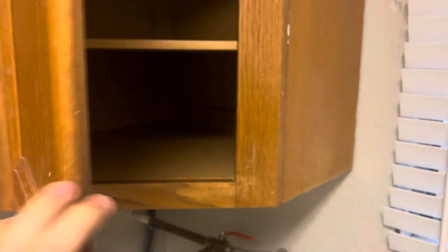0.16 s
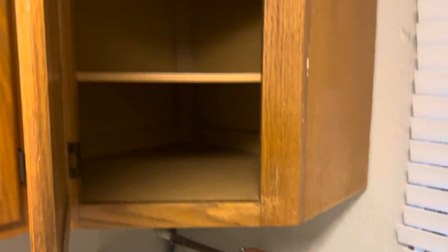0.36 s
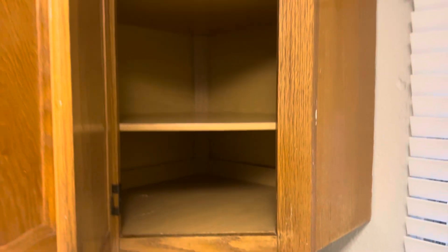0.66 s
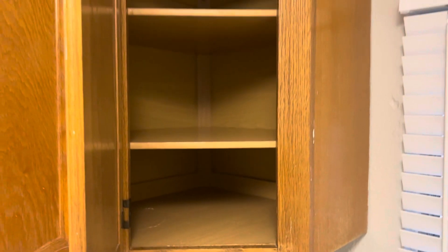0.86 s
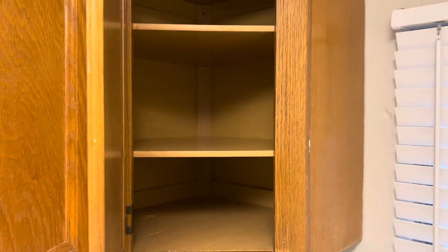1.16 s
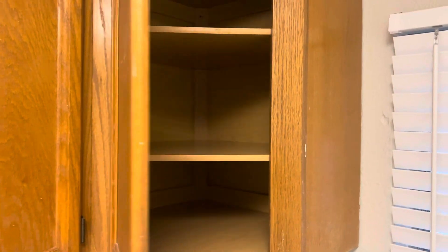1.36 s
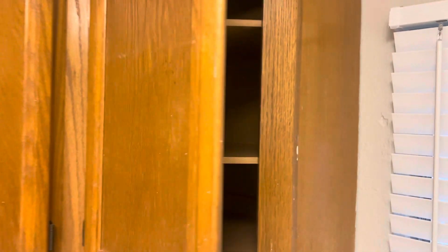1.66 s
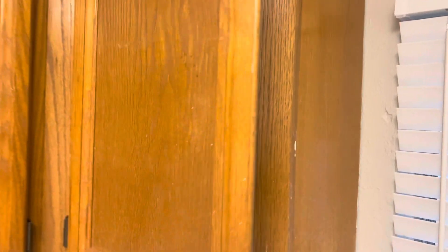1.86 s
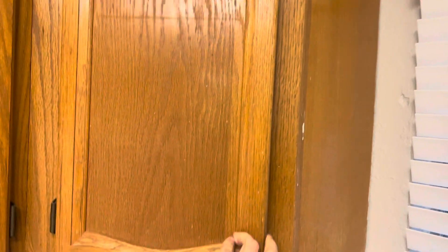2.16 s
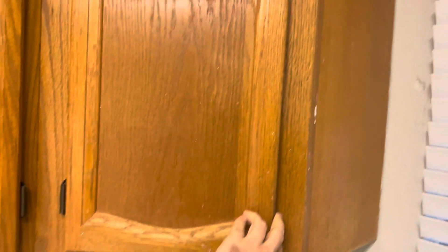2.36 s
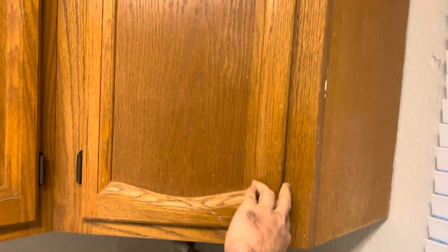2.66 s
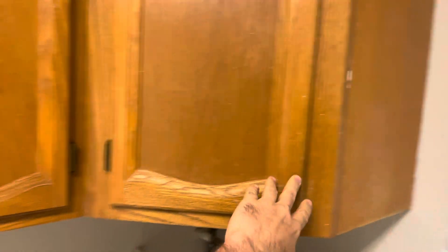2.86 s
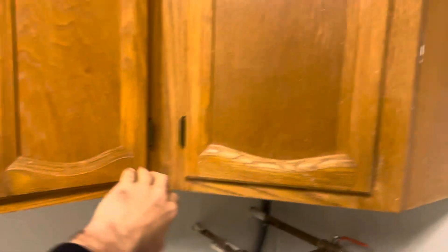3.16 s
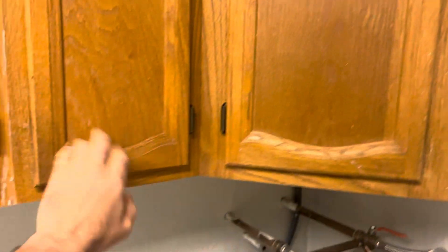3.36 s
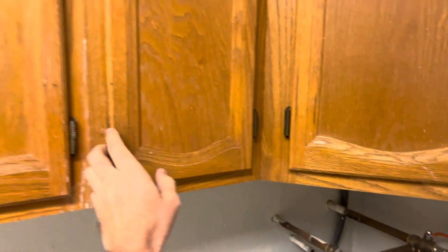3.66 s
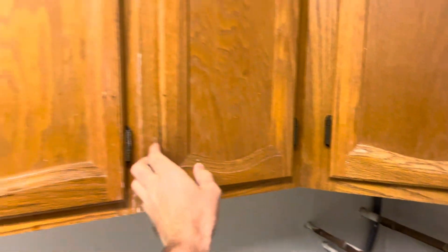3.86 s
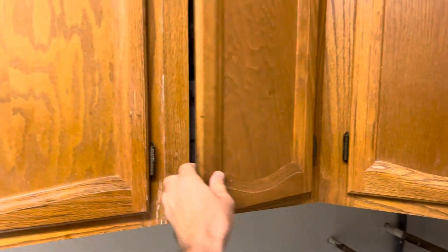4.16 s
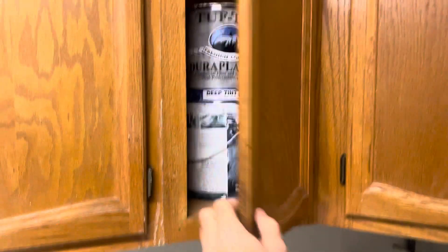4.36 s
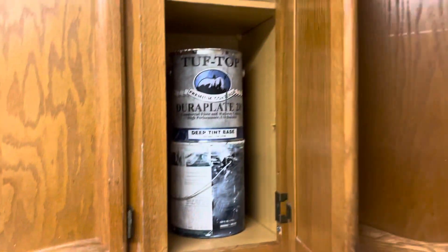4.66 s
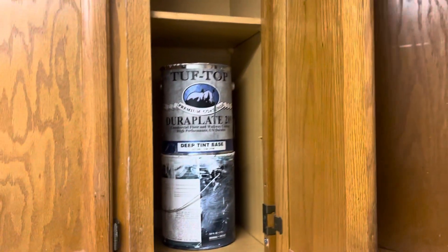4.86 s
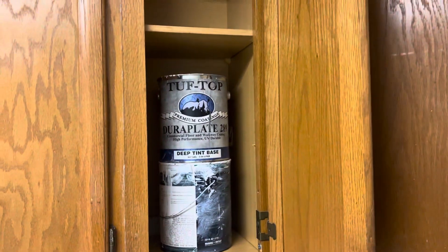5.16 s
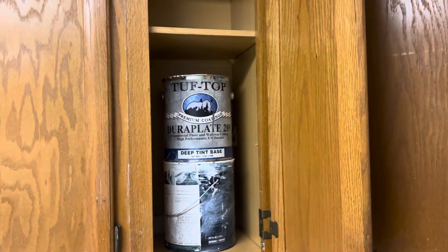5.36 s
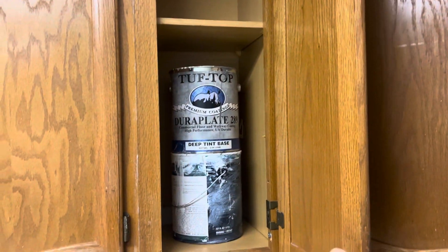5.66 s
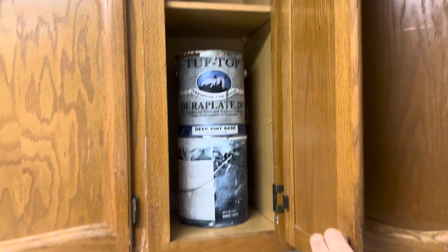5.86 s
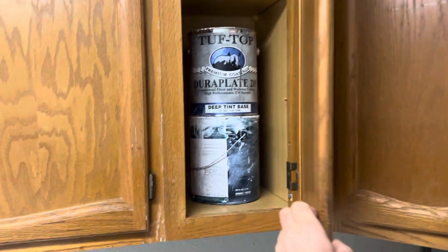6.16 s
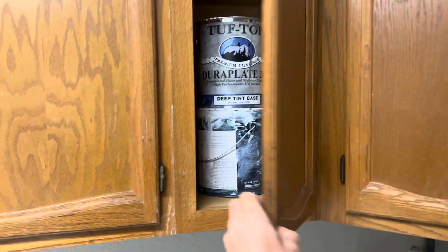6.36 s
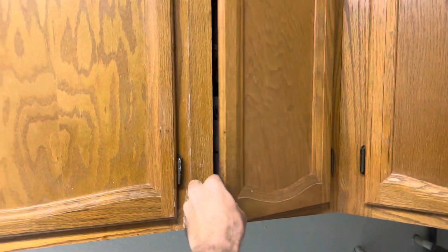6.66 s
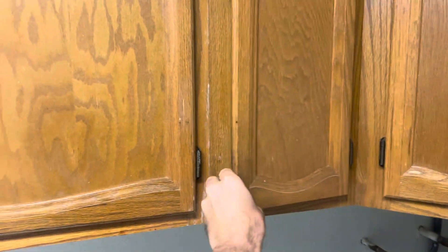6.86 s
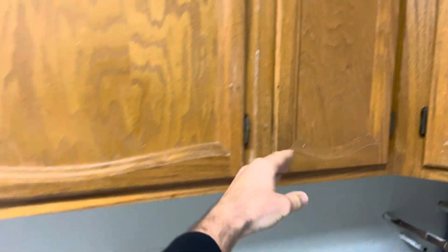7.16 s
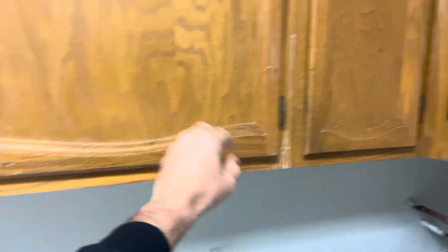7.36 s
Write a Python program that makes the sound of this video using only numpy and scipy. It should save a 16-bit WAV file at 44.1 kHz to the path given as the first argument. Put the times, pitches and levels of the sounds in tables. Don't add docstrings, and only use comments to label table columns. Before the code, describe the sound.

Arm's-length stereo pickup of hands working wooden wall cabinets in an empty, reverberant room. A woody pull comes first, then creaky low wobbles building to a boomy shutting thud and rebound. Fingers brush and tap, a metal catch clicks, and a second, drier thud bounces briefly. A quiet stretch holds only small ticks and soft scuffs over faint hum and air, before a sudden slam, by far the loudest event, cracks and rattles at the end.

```python
import sys
import numpy as np
from scipy import signal
from scipy.fft import rfft, irfft, next_fast_len
from scipy.io import wavfile

SR = 44100
rng = np.random.default_rng(int(sys.argv[2]) if len(sys.argv) > 2 else 0)


def elevation(decibels):
    levels = np.asarray(decibels, float)
    return 10 ** (levels / 20)


def dump(signal):
    limited = np.clip(np.atleast_2d(signal).T, -1, 1)
    pcm = np.round(limited * 32767).astype(np.int16)
    wavfile.write(sys.argv[1], SR, pcm)


N = 332073

# (frequency [Hz], density [dB per Hz])
RUMBLE_SPECTRUM = [(15, -42), (25, -29), (49, 0), (91, -7.5), (123, -12), (151, -11.5), (233, -13.5),
                   (325, -15.5), (357, -12.5), (387, -15), (479, -21.5), (600, -25), (780, -54)]
# (frequency [Hz], density [dB per Hz])
DUCT_SPECTRUM = [(350, -26.5), (600, -3.5), (715, -0.5), (740, -4), (1000, -1.5), (1070, -1), (1420, -6),
                 (1530, 0.5), (1780, 1.5), (2800, -13.5), (3200, -45), (4160, -53), (7040, -120)]
RUMBLE_DB, DUCT_DB = -56, -61.5
# (frequency [Hz], level [dB rms])
HUM_LINES = [(120, -56.5), (240, -67.5), (360, -65), (480, -72.5)]
# (time [s], frequency [Hz], level [dB])
WHINE = [(3.15, 794, -94), (3.4, 805, -71.5), (4.4, 812, -71.5), (4.7, 815, -84)]
# (time [s], level [dB])
RUSTLE = [(0.0, -81.5), (0.32, -77), (0.48, -80), (1.64, -77.5), (1.87, -80), (2.51, -82.5), (2.71, -78.5),
          (3.49, -81), (4.07, -73.5), (4.17, -78.5), (4.87, -85), (5.96, -84), (6.82, -80), (7.16, -76)]
# (frequency [Hz], density [dB per Hz])
DULL_RUSTLE = [(2000, -43), (3000, -0.5), (4000, -2), (5200, -6.5), (7000, -31.5)]
BRIGHT_RUSTLE = [(4000, -19), (6000, 2), (8300, 1), (10000, 2), (12000, -4), (14500, -29), (16200, -34)]
DULL_DB, DULL_FOLLOWS, BRIGHT_DB = -73.5, 0.4, 4

# (time [s], hold [s], level [dB], low edge [Hz], high edge [Hz])
SCUFFS = [(0.45, .015, -64, 1500, 3100), (0.48, 0.025, -68.5, 2500, 5270), (4.026, .02, -55, 600, 2000),
          (3.09, 0.029, -67, 500, 2550), (3.16, .06, -68, 1400, 2400), (6.875, 0.028, -75, 2490, 7950),
          (6.936, 0.04, -69, 1500, 8900), (2.535, 0.0054, -48.5, 600, 2570), (2.765, .006, -59, 800, 2080),
          (4.05, 0.069, -67, 2980, 13900), (4.548, .004, -83, 5500, 9000), (7.21, 0.053, -26, 500, 1190)]
SCUFF_GRAINS_PER_S = 3200
# (time [s], hold [s], level [dB], frequency [Hz])
WOBBLES = [(0.218, 0.043, -56, 70.4), (0.378, 0.071, -53, 74), (1.624, 0.018, -52, 66),
           (1.761, 0.039, -51, 69), (1.892, 0.016, -45, 67.3), (2.068, 0.02, -44, 78),
           (2.124, .06, -45, 66), (2.24, 0.068, -46, 67), (2.052, 0.1, -48.5, 191.4), (2.8, .05, -45, 240),
           (2.81, .1, -58, 640), (2.124, 0.037, -52.5, 285), (2.209, .03, -54, 375), (2.428, .02, -52, 371),
           (3.612, 0.014, -49, 284.7), (3.645, 0.017, -48.5, 265), (2.058, 0.028, -49.5, 264),
           (2.255, 0.039, -44.5, 189.6), (2.418, 0.081, -48.5, 189), (2.433, 0.015, -38.5, 68),
           (2.716, 0.022, -34.5, 73), (2.774, .08, -31.5, 63), (2.778, .008, -32, 67.7),
           (2.898, 0.081, -44, 65.7), (3.451, 0.011, -33, 84), (3.499, 0.01, -44, 88.7),
           (3.58, .012, -55, 88), (3.667, 0.017, -48.5, 91.5), (3.753, 0.017, -50, 92.5),
           (5.589, .015, -55, 83), (6.553, .03, -54, 78), (6.65, .08, -54.5, 73)]
# (time [s], hold [s], level [dB])
BOOMS = [(1.975, 0.026, -47.5), (2.208, 0.027, -45.5), (2.264, 0.056, -37.5), (2.51, 0.021, -43),
         (2.655, .015, -39), (2.767, .012, -35), (3.507, 0.062, -38), (3.64, .02, -53.5),
         (4.176, 0.077, -48), (4.322, 0.13, -53), (5.458, 0.026, -58), (5.6, 0.024, -70),
         (6.775, 0.035, -51), (7.038, 0.13, -56)]
BOX_HZ = 119
# (time [s], hold [s], level [dB])
DRAGS = [(0.372, 0.032, -52.5), (1.722, 0.035, -53.5), (1.868, 0.034, -51.5), (2.051, 0.096, -46),
         (2.212, 0.091, -51), (2.404, 0.04, -49.5), (2.65, .015, -56), (2.739, 0.092, -39.5),
         (3.45, 0.1, -55), (3.625, 0.037, -52), (3.761, 0.016, -55.5), (5.467, 0.029, -53),
         (5.572, 0.012, -61), (6.51, .015, -55), (6.637, 0.12, -50), (6.871, 0.039, -51)]
RISE_DB_PER_S, SCUFF_FALL_DB_PER_S = 1000, 259
WOBBLE_FALL_DB_PER_S, BOOM_FALL_DB_PER_S, DRAG_FALL_DB_PER_S = 221, 301, 253

# (time [s], level [dB], frequency [Hz], t60 [s])
PINGS = [(0.094, -38, 1390, 0.051), (0.095, -45, 1200, 0.03), (0.096, -38, 600, .05),
         (0.146, -41.5, 267, 0.19), (0.4501, -49, 1790, .05), (0.41, -51, 2910, 0.027),
         (1.8, -49.5, 816, 0.054), (1.9, -58, 1276, 0.097), (2.403, -54, 1240, 0.035), (2.2, -48, 754, .05),
         (1.1052, -48, 7740, .012), (1.112, -49, 1150, 0.055), (1.107, -57, 2580, .03),
         (2.528, -24.5, 266, 0.048), (2.5275, -34, 580, 0.077), (2.5353, -31.5, 1100, .06),
         (2.5353, -43, 1430, 0.037), (2.537, -45, 1500, 0.045), (2.535, -56, 2160, 0.027),
         (2.58, -46, 1240, .06), (2.754, -41.5, 1100, 0.081), (2.8, -46, 1060, 0.06),
         (2.699, -48, 1220, 0.04), (2.7567, -51, 1730, 0.068), (2.8, -52, 1690, .05),
         (3.603, -57, 4140, 0.037), (3.8804, -30, 14400, 0.0035), (3.8806, -41, 6400, .008),
         (3.8815, -40.5, 8800, 0.012), (3.88, -48.5, 2670, 0.022), (3.8806, -45.5, 2280, .03),
         (4.02, -41, 1350, 0.024), (4.021, -44, 1610, 0.036), (4.021, -23.5, 250, 0.034),
         (4.025, -47, 2160, .03), (5.433, -54, 8800, .02), (4.377, -61, 8370, .02),
         (4.575, -59, 7800, 0.011), (3.0985, -48, 1400, 0.014), (3.099, -45.5, 560, 0.057),
         (5.44, -47.5, 850, 0.096), (7.182, -15.5, 2330, 0.046), (7.179, -15, 1773, 0.06),
         (7.183, -14, 655, 0.1), (7.2, -20, 876, .08), (7.25, -23, 1600, 0.053), (7.25, -26, 1150, 0.041),
         (7.25, -24.5, 2970, .03), (7.3, -36, 1630, 0.072)]
# (time [s], level [dB], frequency [Hz], t60 [s])
MORE_PINGS = [(0.0918, -46, 8400, 0.01), (0.0918, -44, 9700, .01), (0.0918, -42, 11200, .008),
              (0.0918, -47, 13200, .01), (0.0918, -47, 15600, .006), (3.892, -55, 8900, .008),
              (3.892, -57, 13000, .008), (5.439, -50, 2600, 0.022), (5.435, -52, 1500, .015),
              (2.754, -48, 1500, .012), (2.4035, -52, 1700, .012), (7.184, -21, 4400, 0.023),
              (7.183, -21, 6300, 0.023), (7.186, -21, 1450, .04), (7.213, -29, 6300, .04),
              (4.029, -20, 105, .12), (7.251, -28, 4300, .03), (7.251, -27, 2300, .04), (3.8812, -44, 1200, .03)]
PING_RISE_CYCLES, PING_SPREAD, PING_ROOM_DB = 1.7, 0.0813, -5.5
# (time [s], crack [dB], ring [dB], ring frequency [Hz], brightness above 9 kHz [dB])
TICKS = [
    (1.1062, -55, -54, 1200, 0),
    (2.7, -58, -50.5, 1220, -8),
    (3.4382, -65.5, -63, 813, 5),
    (3.8817, -50, -42, 1280, 0),
    (4.3777, -64, -51, 1100, -6),
    (4.575, -66, -53, 1100, 6),
    (4.7037, -62, -66, 770, 0.5),
    (5.4327, -53.5, -70, 850, -1.5),
]
TICK_PANEL_DB, TICK_OVERTONE = -52, 2.14

# (time [s], crack [dB], thud [dB], panel [dB], knock [dB])
PULL = [
    (0.0919, -31.5, -49, -45, -43.5),
    (0.1053, -42, -44, -27, -43),
    (0.1100, -60, -42.5, -30, -46),
]
TOUCHES = [(0.4486, -62, -66, -72, -55.5), (0.4877, -71, -63, -71, -77), (2.8402, -59, -34.5, -43, -57),
           (3.0963, -76, -72, -46.5, -51.5), (3.1276, -80, -78, -43, -52.5), (3.4387, -66, -60, -63, -63),
           (3.601, -52.5, -42.5, -43, -54), (3.798, -56.5, -46, -59, -59), (5.598, -76, -54, -64, -84),
           (6.7302, -70, -61, -39, -63), (6.9392, -73, -74, -50, -71)]
REBOUNDS = [
    (2.404, -64, -40, -47, -53),
    (2.755, -64, -29, -27, -42),
    (2.799, -68, -41, -40, -46),
]
FIRST_DOOR = [
    (2.5327, -45.5, -19.5, -36, -32),
    (2.543, -59, -17, -18, -43.5),
    (2.5895, -71, -30.5, -21.5, -43),
]
SECOND_DOOR = [
    (4.020, -44.5, -43, -23.5, -37.5),
    (4.0315, -58, -23, -27, -37),
    (4.085, -53, -31.5, -44.5, -51),
    (4.134, -51, -29.5, -49, -71),
]
SLAM = [
    (7.177, -25.5, -45, -18.5, -17.5),
    (7.1815, -10.5, -43, -6, -23),
    (7.184, -28, -27, -9, -24),
    (7.191, -38, -19.5, -9.5, -20.5),
    (7.211, -23.5, -18, -11.5, -32),
    (7.250, -23.5, -11, -14, -25),
    (7.309, -48, -47, -15, -38),
]
# (frequency [Hz], width [Hz], level [dB])
PULL_MODES = [(83, 9.3, -3), (129.5, 13, -5), (182, 10.5, 0), (242.2, 12.6, 10), (256, 26, 4.5),
              (329, 15, -1), (428, 18, 2.5), (744, 62, 10), (1100, 150, -9), (1330, 58, -11)]
FIRST_MODES = [(67, 11, -5), (84.6, 6.9, 2.5), (129.2, 11.6, 2.5), (198, 63, 5.5), (220, 23.5, -1.5),
               (281.5, 37.5, 0.5), (296, 40, 0), (362.5, 20.3, -3.5), (500, 21, -17.5), (645.6, 8.3, 8),
               (750, 22, 7), (1076, 10, 10.5), (1114, 13.4, -3), (1370, 36, -29), (1690, 32, -19),
               (2220, 130, -19)]
SECOND_MODES = [(57, 36, -33), (84, 3, -8), (115.4, 11, 2), (140, 37, 6), (205, 5.8, 3), (251, 19.6, 12.5),
                (312, 7.2, -5), (360, 20, -7), (443, 17, -1), (624, 8.3, 0.5), (744, 10, 1), (950, 22, 5),
                (1080, 27, 2), (1220, 18, 5), (1590, 50, 2), (2180, 110, -37)]
SLAM_MODES = [(63, 3.7, -10.5), (76.5, 4.9, 3), (92.2, 7.6, 9), (100.7, 2.53, -5), (128.6, 3.2, -3.5),
              (172.2, 7.7, -3.5), (205.6, 18.2, 0), (272, 29, 4), (287, 13.4, 2.5), (369.4, 5.5, -14),
              (438, 8.4, -10.5), (458, 32, -0.5), (552.4, 19.4, -7), (640, 12, 6), (826, 8.3, -6),
              (871, 13, 8.5), (1030, 33, 10), (1150, 27, -19), (1340, 26, -19), (1376, 47, 10),
              (1600, 83, -15), (1770, 42, -2.5), (2260, 13, -10), (2330, 42, 15.5)]
HELD_MODES = [(192.2, 6.3, 12.5), (250, 28, 9.5), (281.5, 4.5, 6), (375, 27, -1.5), (460, 22, -8),
              (607, 75, -12), (794, 9.5, -2.5), (1070, 28, -16)]
BODY_EDGES_HZ = [150, 600]
BOUNCE_DULLS_DB = 4
# (frequency [Hz], level [dB], t60 [s])
FIRST_LINGERS = [(81, -32, .26), (129, -31, 0.28), (221.5, -36, .3), (291, -37, .22), (371.2, -38, .4),
                 (630, -45.5, 0.42), (1075, -48, .2), (1690, -54, .2)]
SECOND_LINGERS = [(96.8, -29, .5), (124, -29, .46), (146.3, -38, 0.63), (225, -35, .4), (345, -44.5, 0.45),
                  (462, -43, .25), (616, -48.5, 0.36)]
SLAM_LINGERS = [(177.7, -22, .5), (221, -27, .5), (275.5, -19.5, 0.54), (292, -19.5, 0.52), (371, -31, .9),
                (457, -23, 0.53), (554, -29, 0.62), (661, -27, .6), (880, -28, 0.38), (1033, -27, .5),
                (1473, -31, .4), (1553, -31, 0.42), (2100, -30, .3), (2323, -28, 0.32), (2957, -38, 0.3)]
LINGER_STARTS_S = [
    2.538,
    4.029,
    7.183,
]
LINGER_RISE_CYCLES = 1.9

# (frequency [Hz], t60 [s], level [dB])
ROOM = [(59.3, 1, -13.5), (130, 0.63, -7), (250, 0.44, -4.5), (420, 0.55, -2.5), (690, 0.67, 3),
        (1500, 0.68, 0), (2400, 0.6, 2.5), (4970, 0.58, 0.5), (9250, 0.52, -0.5), (11800, 0.15, 3),
        (15000, 0.22, -10)]
ROOM_BUILD_S = 0.0012
DOOR_LEAN = 0.25
# (frequency [Hz], likeness [0-1], left minus right [dB], right leads [rad])
PORTS = [(50, 0.73, -0.5, 0.59), (395, 0.74, -2.5, 0.36), (743, 0.16, -4, -1.9), (1950, 0, 2, 0.88),
         (3140, 1, 1.5, -1.83), (5500, 0.03, 4, 1.25), (6600, 0.65, -1.5, 0.81), (8180, 0.5, 2, 0.16)]
PORTS_TOP = [(9300, .99, 0, 2.93), (11100, .99, 0, 2.97), (11800, .6, 0, 4.9), (12600, .97, 0, 6.25),
             (14300, .97, 0, 6.5), (14900, .97, 0, 6.8), (15600, .9, 0, 9.2), (16300, .8, 0, 12)]


def at_hz(points, hz, column=1):
    points = np.array(points)
    return np.interp(np.log(np.maximum(hz, 1)), np.log(points[:, 0]), points[:, column])


def in_time(rows, silent_db=-120):
    s, *columns = np.transpose(rows)
    t = np.arange(N) / SR
    curves = []
    for column in columns:
        outside = [silent_db] * 2 if column.max() < 0 else []
        curves.append(np.interp(t, s, column, *outside))
    return curves


def rms_one(x):
    return x / np.sqrt(np.mean(x ** 2) + 1e-20)


def drift(rate_hz, channels=1):
    r = np.exp(-2 * np.pi * rate_hz / SR)
    white = rng.standard_normal((channels, N + SR))
    return rms_one(signal.lfilter([1], [1, -2 * r, r * r], white)[:, SR:])


def coloured(spectrum):
    gain = elevation(at_hz(spectrum, np.fft.rfftfreq(N, 1 / SR)))
    return rms_one(irfft(rfft(rng.standard_normal((2, N))) * gain, N))


def band(x, low_hz, high_hz):
    return signal.sosfilt(signal.butter(2, [low_hz, high_hz], "band", fs=SR, output="sos"), x)


def held(s, hold_s, db, fall_db_per_s):
    t = np.arange(N) / SR - s
    return elevation(db + RISE_DB_PER_S * np.minimum(t, 0) - fall_db_per_s * np.maximum(t - hold_s, 0))


def hum():
    t = np.arange(N) / SR
    lines = 0
    for hz, db in HUM_LINES:
        gain = elevation(db - 1.5 + 1.2 * drift(8.3, channels=2))
        lines = lines + gain * np.sin(2 * np.pi * hz * t + 0.099 * drift(5.1))
    whine_hz, whine_db = in_time(WHINE)
    return lines + elevation(whine_db + 7) * np.sin(2 * np.pi * np.cumsum(whine_hz) / SR)


def rustle():
    stir_db = np.interp(np.arange(N) / SR, *np.transpose(RUSTLE))
    flutter_db = 1.17 * drift(0.42, channels=2)
    dull_db = DULL_DB + DULL_FOLLOWS * (stir_db - stir_db.mean()) + flutter_db[0]
    bright_db = stir_db + BRIGHT_DB + flutter_db[1]
    return elevation(dull_db) * coloured(DULL_RUSTLE) + elevation(bright_db) * coloured(BRIGHT_RUSTLE)


def background():
    rumble = elevation(RUMBLE_DB) * coloured(RUMBLE_SPECTRUM)
    duct = elevation(DUCT_DB + 0.25 * drift(0.95)) * coloured(DUCT_SPECTRUM)
    return rumble + duct + rustle() + hum()


def room(x):
    t, tail = np.arange(SR) / SR, 0
    edges_hz = 35 * 2 ** np.arange(0, 9.1, 0.5)
    white = rng.standard_normal((2, 2, SR))
    for k, (low_hz, high_hz) in enumerate(zip(edges_hz, edges_hz[1:])):
        centre_hz = np.sqrt(low_hz * high_hz)
        t60, level_db = at_hz(ROOM, centre_hz, column=1), at_hz(ROOM, centre_hz, column=2)
        dying = elevation(level_db - 60 * t / t60) / np.sqrt(t60 * SR / 14)
        tail = tail + band(white[k % 2], low_hz, high_hz) * dying
    tail = tail * (1 - np.exp(-(t / ROOM_BUILD_S) ** 2))
    return signal.fftconvolve(x[None], tail, axes=1)[:, :N]


def scuffs():
    sparse = (rng.random(N) < SCUFF_GRAINS_PER_S / SR) * rng.standard_normal(N)
    grains = sparse + 0.11 * rng.standard_normal(N)
    out = np.zeros(N)
    for s, hold_s, db, low_hz, high_hz in SCUFFS:
        stroke = band(band(grains, low_hz, high_hz), low_hz, high_hz)
        out += held(s, hold_s, db, SCUFF_FALL_DB_PER_S) * rms_one(stroke)
    return out


def dragged_panel():
    slips = (rng.random(N) < 350 / SR) * rng.standard_normal(N)
    slips = band(slips, 100, 1000)
    panel = 0
    for hz, width_hz, level_db in HELD_MODES:
        r = np.exp(-np.pi * width_hz / SR)
        poles = [1, -2 * r * np.cos(2 * np.pi * hz / SR), r * r]
        panel = panel + elevation(level_db) * rms_one(signal.lfilter([1, 0, -1], poles, slips + 1e-18))
    return elevation(-4.0) * rms_one(panel) * sum(held(*row, DRAG_FALL_DB_PER_S) for row in DRAGS)


def swings():
    t = np.arange(N) / SR
    unsteady = drift(17.5, channels=3)
    wobble = np.zeros(N)
    for s, hold_s, db, hz in WOBBLES:
        swing = np.sin(2 * np.pi * hz * (t - s) + 0.5 * unsteady[1])
        wobble += held(s, hold_s, db, WOBBLE_FALL_DB_PER_S) * swing
    wobble = wobble * (1 + 0.1 * unsteady[0])
    boom = np.sin(2 * np.pi * BOX_HZ * t + 0.34 * unsteady[2])
    boom = boom * sum(held(*row, BOOM_FALL_DB_PER_S) for row in BOOMS)
    return wobble + boom + dragged_panel()


def pings():
    out, t = np.zeros(N + SR), np.arange(SR // 4) / SR
    for s, db, hz, t60 in PINGS + MORE_PINGS:
        rings = np.sin(2 * np.pi * hz * t) * (1 + np.cos(2 * np.pi * PING_SPREAD * hz * t))
        swell = 1 - np.exp(-t * hz / PING_RISE_CYCLES)
        start = round(s * SR)
        out[start:start + len(t)] += elevation(db - 60 * t / t60) * swell * rings
    return out[:N]


def ticks():
    out = 0
    for s, crack_db, ring_db, ring_hz, bright_db in TICKS:
        modes = [(210, 20, 0), (300, 25, -2), (460, 30, -5),
                 (ring_hz, 60, 0), (TICK_OVERTONE * ring_hz, 250, -1)]
        contact = (s, crack_db, -90, TICK_PANEL_DB, ring_db)
        out = out + knocks([contact], modes, crack_t60=0.057, rise_s=0.0001, swell_s=0.0059,
                           grit_db=2.5, bright_db=bright_db)
    return out


def lingering():
    out = np.zeros(N)
    for s, modes in zip(LINGER_STARTS_S, (FIRST_LINGERS, SECOND_LINGERS, SLAM_LINGERS)):
        start = round(s * SR)
        t = np.arange(min(SR, N - start)) / SR
        hz, db, t60 = np.transpose(modes)[:, :, None]
        swell = 1 - np.exp(-t * hz / LINGER_RISE_CYCLES)
        rings = elevation(db - 60 * t / t60) * swell * np.sin(2 * np.pi * hz * t)
        out[start:start + len(t)] += np.sum(rings, axis=0)
    return out


def knocks(contacts, modes, crack_t60, rise_s, swell_s, grit_db, bright_db, dulls_db=0):
    out, t = np.zeros(N + SR), np.arange(SR // 2) / SR
    hz, width_hz, level_db = np.transpose(modes)[:, :, None]
    group = np.searchsorted(BODY_EDGES_HZ, hz[:, 0])
    group_power = [[np.sum(elevation(level_db[group == g]) ** 2)] for g in group]
    share = elevation(level_db) / np.sqrt(group_power)
    width_hz = np.maximum(width_hz, (hz - 400) / 16)
    swell = 1 - np.exp(-t * hz / (100 * swell_s))
    rings = np.exp(-np.pi * width_hz * t) * swell * np.sin(2 * np.pi * hz * t)
    for k, (s, crack_db, *body_db) in enumerate(contacts):
        mode_db = np.array(body_db)[group, None] + rng.standard_normal((len(modes), 1))
        hit = (-1) ** (k + 1) * np.sum(share * elevation(mode_db) * rings, axis=0)
        dying = elevation(-60 * t / crack_t60)
        noise = rng.standard_normal((3, len(t))) * dying * (1 - np.exp(-t / rise_s))
        crack = band(band(noise[0], 1100, 10700), 250, 10600)
        top = band(noise[1] * dying, 6400, 18000)
        top_db = bright_db - dulls_db * max(k - 1, 0)
        hit += elevation(crack_db) * (crack + elevation(top_db) * top)
        hit += elevation(body_db[2] + grit_db) * band(noise[2], 467, 1740)
        start = round(s * SR)
        out[start:start + len(t)] += hit
    return out[:N]


def pulled_door():
    return knocks(PULL, PULL_MODES, crack_t60=0.044, rise_s=0.0001, swell_s=0.01, grit_db=15.5, bright_db=-23)


def shut_doors():
    out = knocks(TOUCHES, FIRST_MODES, crack_t60=0.11, rise_s=0.005, swell_s=0.007,
                 grit_db=13, bright_db=-13)
    out += knocks(REBOUNDS, FIRST_MODES, crack_t60=0.033, rise_s=0.0021, swell_s=0.013,
                  grit_db=10.5, bright_db=-10)
    out += knocks(FIRST_DOOR, FIRST_MODES, crack_t60=0.053, rise_s=0.00076, swell_s=0.0092,
                  grit_db=12, bright_db=-18)
    out += knocks(SECOND_DOOR, SECOND_MODES, crack_t60=0.077, rise_s=0.0047, swell_s=0.0041,
                  grit_db=7.5, bright_db=-12)
    out += knocks(SLAM, SLAM_MODES, crack_t60=0.051, rise_s=0.00039, swell_s=0.0088,
                  grit_db=17.5, bright_db=-9.5, dulls_db=BOUNCE_DULLS_DB)
    return out


def scene():
    doors = shut_doors() + ticks()
    pull, rings, moving = pulled_door(), pings(), swings()
    to_walls = doors + elevation(PING_ROOM_DB) * rings + elevation(-4.5) * pull + elevation(-6) * moving
    heard = lingering() + doors + rings + pull + moving + room(to_walls)
    lean = DOOR_LEAN * band(heard, 720, 4400) * [[-1], [1]]
    return heard + lean + background() + scuffs()


def roll_off(x):
    return signal.sosfilt(signal.butter(12, 16510, fs=SR, output="sos"), x)


def record(dry):
    size = next_fast_len(N + 4096)
    hz = np.fft.rfftfreq(size, 1 / SR)
    alike, lean_db, lead_rad = [at_hz(PORTS + PORTS_TOP, hz, column=c) for c in range(1, 4)]
    alike = np.clip(alike, 0, 1)
    left, right = rfft(dry, size)
    mid = np.sqrt(1 + alike) * (left + right) / 2
    side = np.sqrt(1 - alike) * (left - right) / 2
    turn = np.exp(-0.5j * lead_rad * np.tanh(hz / 200))
    tilt = elevation(lean_db / 2) * turn
    ports = irfft(np.array([(mid + side) * tilt, (mid - side) / tilt]), size)[:, :N]
    ports = signal.sosfilt(signal.butter(2, 38, "high", fs=SR, output="sos"), ports)
    rounded = 1.2 * np.tanh(ports / 1.2)
    mix = signal.sosfilt(signal.cheby2(10, 60, 16900, fs=SR, output="sos"), rounded)
    return roll_off(mix)


dry = scene()
out = record(dry)
dump(out)
```